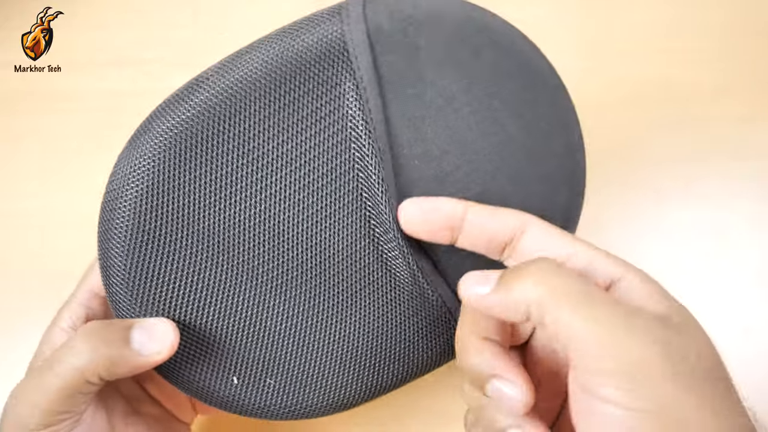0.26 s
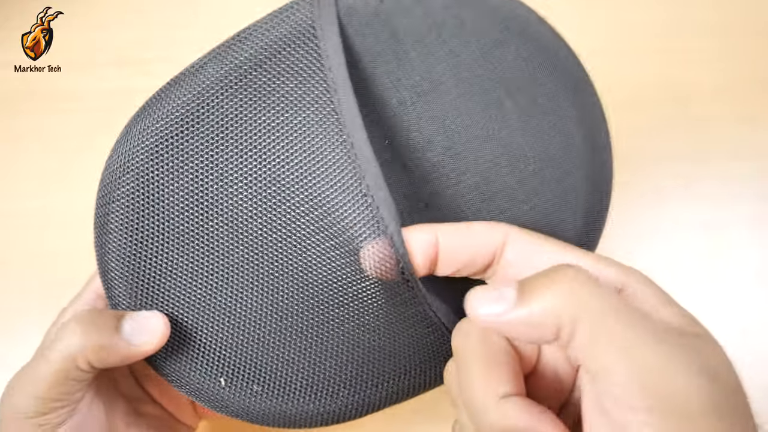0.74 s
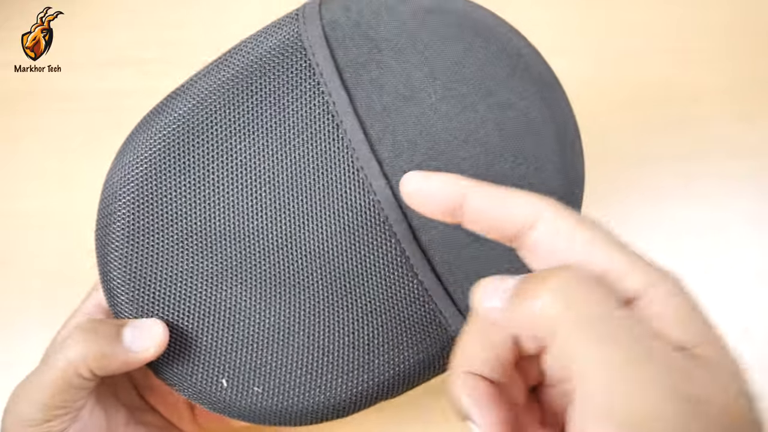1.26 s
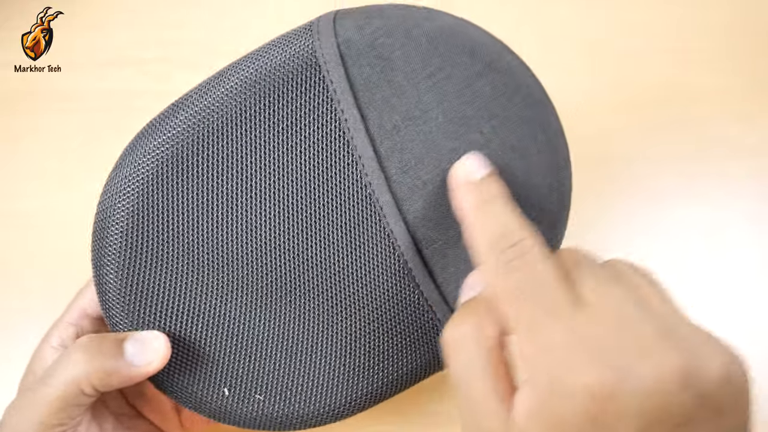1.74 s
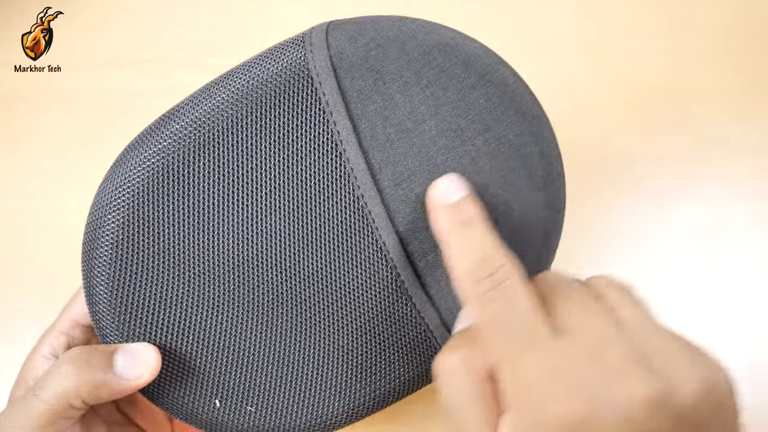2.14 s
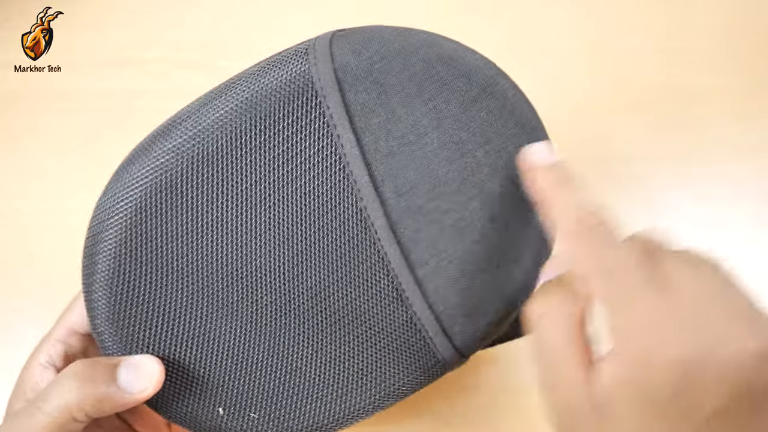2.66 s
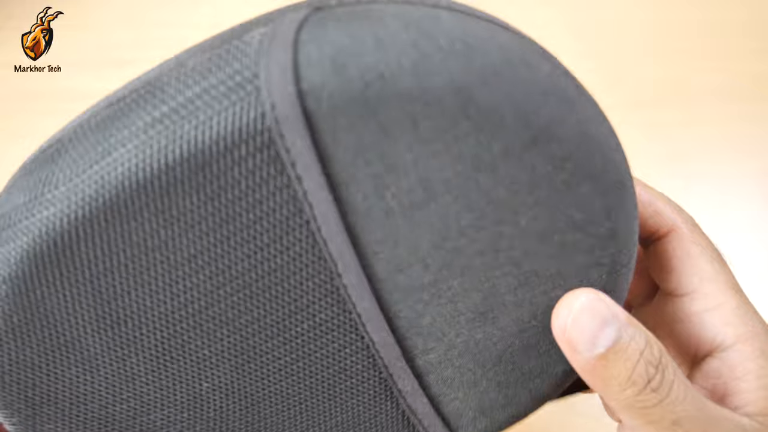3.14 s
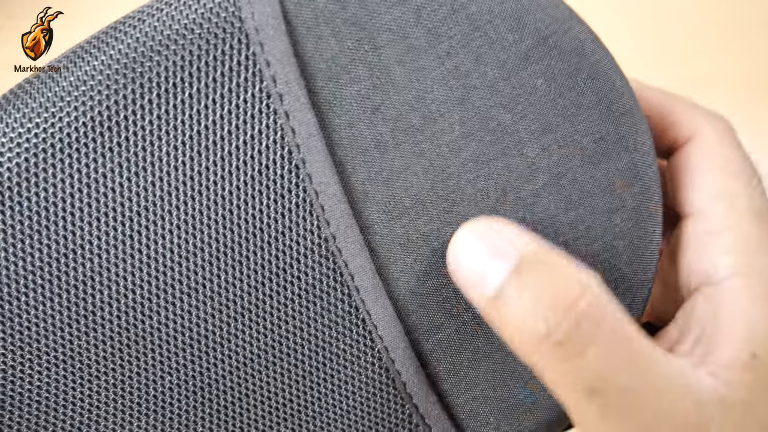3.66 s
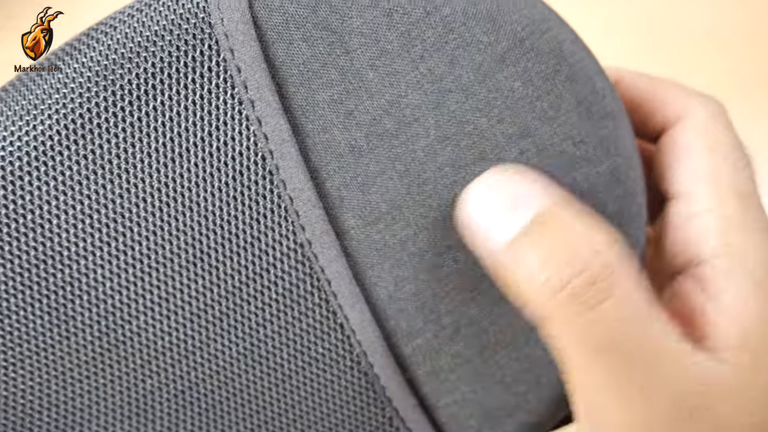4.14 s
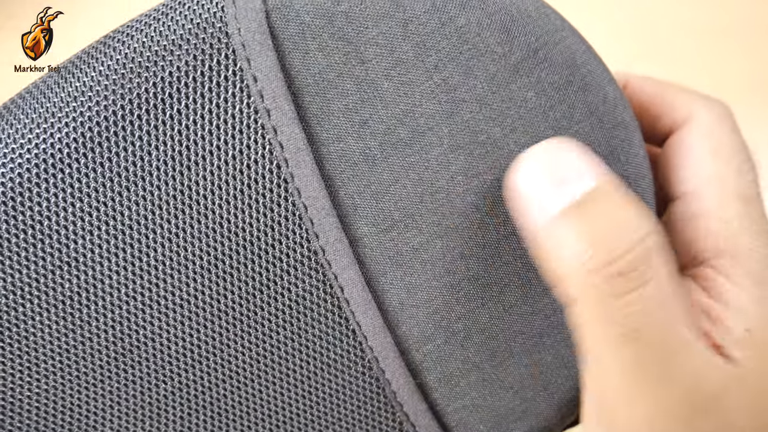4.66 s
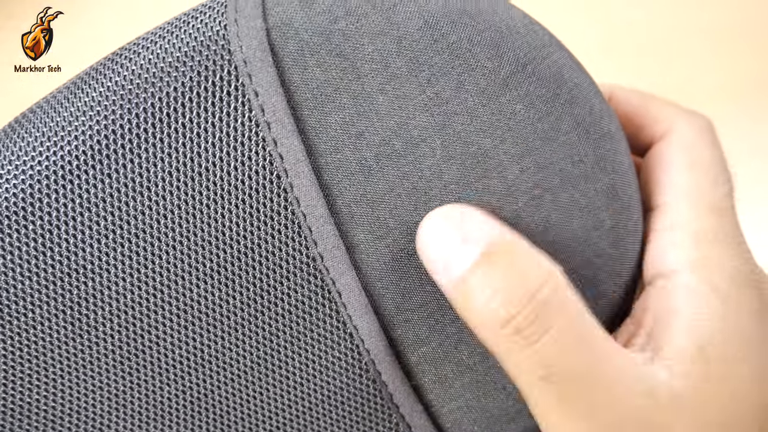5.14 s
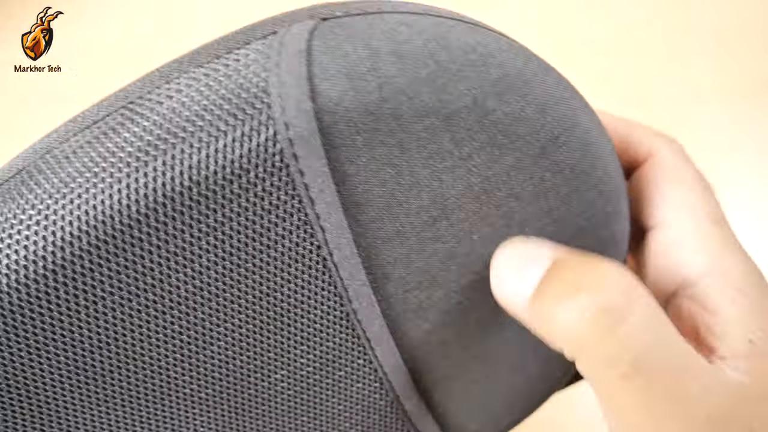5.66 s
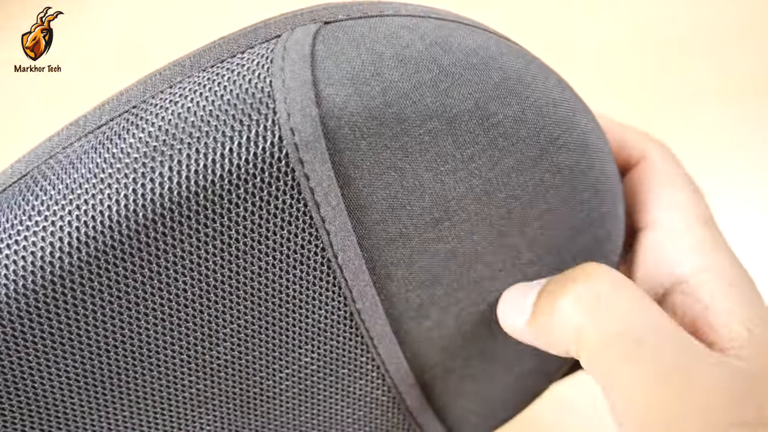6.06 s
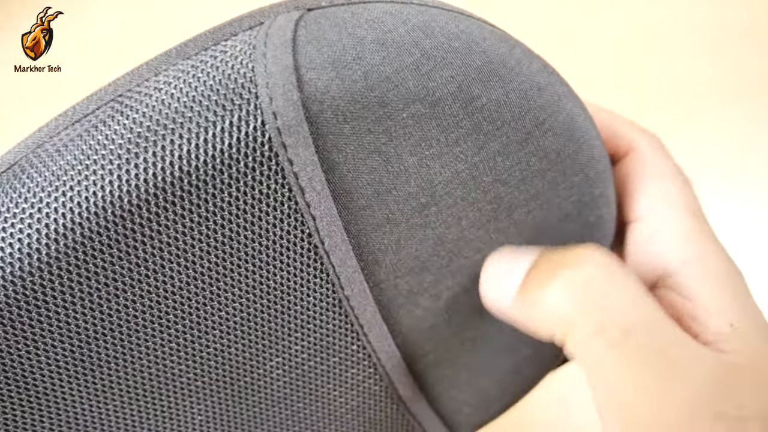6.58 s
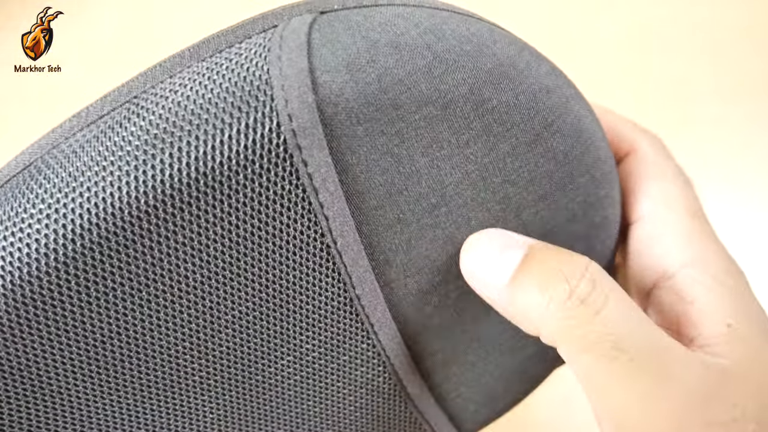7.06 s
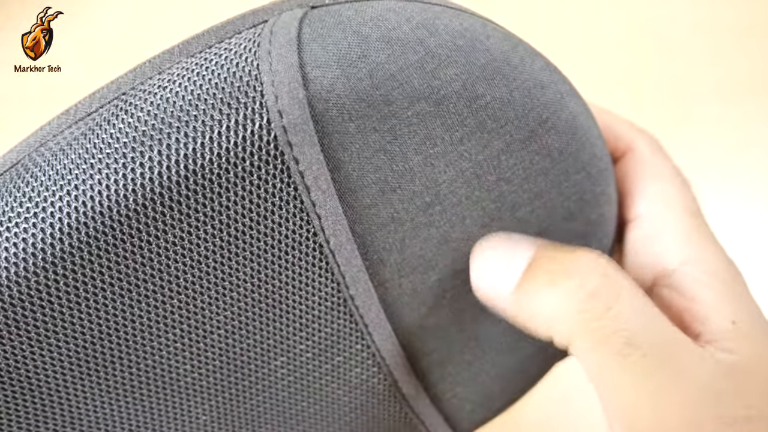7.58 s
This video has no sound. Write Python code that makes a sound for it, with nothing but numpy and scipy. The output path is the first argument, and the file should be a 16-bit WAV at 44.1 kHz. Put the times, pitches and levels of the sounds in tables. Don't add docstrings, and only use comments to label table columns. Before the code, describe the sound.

A finger taps a fabric-covered hard case twice and rustles its mesh pocket, then flicks the hem with a loud, distorted snap. After another dull tap, quick fingertip swipes zip across the weave. A thumb then rubs back and forth, softer and blurrier, and a nail scratches with gritty jerks and tiny ticks. Very close microphone in a quiet room, strong on the left, much fainter on the right.

```python
import sys
import numpy as np
from scipy import signal
from scipy.fft import rfft, irfft, next_fast_len
from scipy.io import wavfile
from scipy.ndimage import uniform_filter1d, map_coordinates

SR = 44100
rng = np.random.default_rng(int(sys.argv[2]) if len(sys.argv) > 2 else 0)


def invert_db(level):
    return 10 ** (np.asarray(level, dtype=float) / 20)


def bounce(signal):
    frames = np.transpose(np.atleast_2d(signal))
    limited = np.clip(frames, -1, 1)
    pcm = np.round(limited * 32767).astype(np.int16)
    wavfile.write(sys.argv[1], SR, pcm)


N = 344421
TIME = np.arange(N) / SR

# pitch_hz, level_db_per_hz
ROOM_TONE = [(29, -31.5), (50, -15.5), (70, -15.5), (81, -26), (159, -36.5), (213, -30.5), (313, -31.5),
             (418, -32.5), (1070, -44), (1500, -40.5), (1960, -45), (14200, -48), (16000, -50)]
# pitch_hz, level_db_per_hz
HAND_RUMBLE = [(8, -37.5), (18, 9.5), (27, 2.5), (45, -18.5), (90, -57)]
# peak_s, rise_s, fall_s, level_db
JOLTS = [
    (.08, 0.045, 0.35, -50.5),
    (.73, 0.09, 0.25, -52),
    (.94, 0.071, 0.061, -47),
    (1.39, 0.053, .04, -49.5),
    (2.501, 0.11, .17, -35.5),
    (2.74, 0.099, 0.64, -45),
    (5.75, 0.39, 0.28, -53.5),
    (6.3, 0.14, .15, -57.5),
    (7.16, 0.11, 0.41, -43.5),
    (7.81, 0.13, 0.12, -51),
]

# pitch_hz, level_db_per_hz
FOREFINGER_FIBRES = [(710, -8), (1200, 2), (1320, -10.5), (1440, -1.5), (1640, -11.5), (1790, -4.5),
                     (2480, -8.5), (3950, -2.5), (4410, -3.5), (7020, -3), (12500, -6), (14800, -5),
                     (16000, -35)]
# pitch_hz, level_db_per_hz
THUMB_FIBRES = [(710, -49), (1200, -6), (1800, -9), (2500, -9), (3250, -9), (3550, -2), (4700, -4.5),
                (5800, -5), (9600, -8.5), (14500, -13), (16000, -22.5)]
# pitch_hz, level_db_per_hz
EDGE_FIBRES = [(710, -34), (1200, -3.5), (1800, -4.5), (2100, -11.5), (3300, -7.5), (3750, -3),
               (5200, -7.5), (5800, -3), (8500, -7.5), (12000, -10), (14500, -13.5), (16000, -24)]
# pitch_hz, level_db_per_hz
BRUSH_FIBRES = [(710, -33), (1200, -2.5), (2200, -8.5), (2700, -2), (4500, -4.5), (9000, -8), (14500, -9.5),
                (16000, -22)]
# pitch_hz, level_db_per_hz
POCKET_RUSTLE = [(120, -31), (200, -6), (369, -2), (633, -16.5), (674, -11), (1020, -8.5), (2500, -18.5),
                 (3250, -57), (5500, -120)]
# pitch_hz, level_db_per_hz
SHELL_RUSTLE = [(120, -30.5), (200, -9.5), (290, -4.5), (502, 0), (681, -3), (757, -9.5), (878, -3.5),
                (1230, -17.5), (2500, -31.5), (3250, -34.5), (5500, -120)]
# pitch_hz, level_db_per_hz
LOW_DRAG = [(40, -33.5), (90, -1.5), (140, 2), (210, 2), (320, -25.5), (600, -42.5)]
# level_db under nail, thumb pad, fingertip
SWISH_DB = (-7.5, -5, -7)
# start_s, end_s
PAD_S = (3.37, 5.5)

# fastest_s, rise_s, fall_s, hiss_db, and threads_hz where the weave is crossed
POCKET = [
    (.038, 0.002, 0.029, -47.5),
    (.135, .012, 0.039, -50),
    (.19, 0.054, 0.12, -57.5),
    (.36, 0.25, 0.14, -51),
    (.515, 0.079, 0.068, -44),
    (.656, 0.12, 0.12, -53),
    (.772, 0.085, 0.087, -47.5),
    (.945, 0.047, 0.028, -44.5),
    (.96, 0.0069, 0.0078, -31.5),
]
SHIFT = [(1.353, .002, 0.065, -58.5), (1.451, .005, 0.01, -56), (1.625, 0.0086, .1, -49.5),
         (3.0, 0.0058, 0.14, -58.5), (3.186, 0.072, 0.054, -53.5), (3.3, 0.064, 0.096, -49.5),
         (5.3, 0.043, 0.21, -55.5), (5.47, 0.05, 0.16, -54), (6.494, 0.0035, 0.037, -52),
         (6.554, 0.0059, 0.036, -56), (7.03, 0.016, 0.077, -73)]
QUICK_OUT = [
    (2.155, 0.096, 0.08, -46.5, 647.8),
]
BRAKING = [
    (1.795, 0.1, .09, -47.5, 690),
    (2.495, .095, 0.072, -45.5, 1150),
]
QUICK_BACK = [
    (2.3, 0.055, .1, -45, 1000),
]
SWEEP_OFF = [
    (1.95, 0.06, .115, -44.5, 930),
    (2.655, 0.079, .09, -44, 920),
]
SLIDE = [
    (3.47, .12, .15, -55, 190),
    (3.66, .1, 0.096, -55.5, 183.9),
]
THUMB_OUT = [
    (3.99, 0.13, .1, -47, 993.3),
    (4.36, 0.082, 0.11, -46.5, 1101),
    (4.746, .1, .11, -47, 1095),
    (5.108, 0.098, .07, -47.5, 1053),
]
THUMB_BACK = [
    (3.76, .13, 0.12, -47.5, 949),
    (4.185, .11, 0.079, -47.5, 1003),
    (4.54, .08, .105, -46.5, 991),
    (4.9, .085, .1, -45.5, 1149),
    (5.215, .05, 0.094, -46, 996),
]
SCRATCH = [
    (5.7, .11, 0.1, -46.5, 640.7),
    (5.855, .05, 0.067, -51, 875.7),
    (6.03, .095, .09, -47, 618.3),
]
RETURN = [(6.162, 0.024, .04, -50, 790), (6.44, 0.02236, .032, -50, 700), (6.727, .02, .035, -53, 740),
          (7.015, 0.01995, .03, -54.5, 600), (7.3, 0.024, .04, -46.5, 790), (7.578, 0.025, .045, -49, 780)]
DIG = [
    (6.957, .013, 0.0362, -46.5, 361.6),
    (7.244, .022, .026, -43, 379.7),
]
SKIM = [
    (6.335, .09, .075, -45.5, 661.4),
    (6.626, .085, .075, -46, 689.7),
]
NAIL = [
    (6.905, 0.068, 0.063, -45.5, 690),
    (7.19, .065, .045, -45, 660),
    (7.46, .065, 0.0448, -46, 640),
    (7.745, 0.049, 0.0412, -46, 740),
]
JAM = [
    (5.727, 0.0159, .03, -53.5, 486.5),
    (7.512, .012, 0.034, -45, 398.4),
    (7.79, 0.019, 0.03, -38.5, 544.4),
]

GESTURES = [
    (POCKET, dict(ends_db=14.0, rise=1.4, fall=1.17, shell_db=1.5, drag_db=-7.0, hum=0, first=1, last=1)),
    (SHIFT, dict(ends_db=12.0, rise=2.05, fall=1.46, shell_db=-6, drag_db=-12.0, hum=0, first=1, last=1)),
    (SLIDE, dict(ends_db=13.5, rise=3.97, fall=5.7, shell_db=-0.5, drag_db=0, hum=0.76, first=.65, last=1.2)),
    (QUICK_OUT, dict(ends_db=22.5, rise=4.55, fall=3.67, shell_db=-0.6, drag_db=-14,
                     hum=.62, first=.5, last=.34, late=.9)),
    (BRAKING, dict(ends_db=23.0, rise=4.6, fall=3.6, shell_db=-0.8, drag_db=-11,
                   hum=.62, first=.6, last=.12, late=.72)),
    (QUICK_BACK, dict(ends_db=24.0, rise=5.9, fall=2.5, shell_db=-0.5, drag_db=-16,
                      hum=.62, first=.3, last=.45, late=.8)),
    (SWEEP_OFF, dict(ends_db=24.5, rise=5.1, fall=2.824, shell_db=-0.5, drag_db=-17,
                     hum=.62, first=.3, last=.88, late=.75)),
    (THUMB_OUT, dict(ends_db=29.5, rise=2.5, fall=2.4, shell_db=-2.5, drag_db=-9.5,
                     hum=0.4514, first=.6, last=0.22, late=.75)),
    (THUMB_BACK, dict(ends_db=20.0, rise=2.16, fall=2.628, shell_db=-4, drag_db=-8.5,
                      hum=0.442, first=0.27, last=.5, late=1.4)),
    (SCRATCH, dict(edge=1.667, ends_db=13.5, rise=2.6, fall=1.486, grows=1.83, shell_db=7.5, drag_db=-3.5,
                   hum=0.449, first=.45, last=0.36)),
    (SKIM, dict(edge=1.663, ends_db=13.5, rise=2.647, fall=1.8, grows=1.17, shell_db=5, drag_db=-4,
                hum=0.31, first=.45, last=.42)),
    (NAIL, dict(edge=1.065, ends_db=9.5, rise=2.2, fall=6.23, grows=1.837, shell_db=7.0, drag_db=-5.5,
                hum=0.58, first=0.55, last=0.75)),
    (RETURN, dict(ends_db=12.0, rise=1.5, fall=0.93, shell_db=7.5, drag_db=-11, hum=0.52, first=.4, last=1.55)),
    (DIG, dict(ends_db=13.0, rise=2.6, fall=2.8, shell_db=12.5, drag_db=7.5, hum=0.78, first=1.45, last=0.65)),
    (JAM, dict(ends_db=7.5, rise=2.3, fall=2.8, shell_db=17.0, drag_db=0.5, hum=0.77, first=1.2, last=0.63)),
]

# start_s, peak_db, rebound_hz, dent_ms, rebound_cycles
TAPS = [(0.0355, -7.5, 147, 1.9, 0.58), (0.0427, -8.5, 165, 2.3, 0.48), (.0462, -27, 400, 1.2, 2.5),
        (0.1272, -22.5, 235, 3, 1.5), (0.1362, -25, 300, 3, 2.6), (1.3517, -8.5, 165, 1.9, 0.66),
        (1.3552, -25, 480, 1, .8), (1.3573, -19, 250, 2.2, .5), (0.5077, -28, 100, 1.2, 1.1),
        (.05, -27, 140, 3, 2.5), (.044, -27, 75, 3, 1.6), (.7534, -31, 330, .8, .8),
        (0.9615, 1.5, 235, 0.58, 0.72), (1.6189, -25.5, 150, 0.51, 0.49), (1.8988, -34, 300, 1.6, 2.2),
        (2.26, -40, 450, 0.66, 1.2), (2.596, -37.5, 453, .6, 1.6), (2.994, -47, 350, .5, 1.5),
        (5.49, -30.5, 48.9, .4, .6), (.9565, -26, 230, 2.5, .8), (6.8069, -30.5, 110, 1.2, 0.72),
        (7.0814, -29.5, 111, 0.81, 0.66), (7.376, -29.5, 111.5, 0.81, 0.56),
        (7.5035, -19.5, 440, 0.65, 3.5), (7.535, -31, 200, 1.5, 4), (7.5696, -30, 326, 0.76, 1.2),
        (7.6465, -33, 110, 0.72, 0.7), (7.7795, -26, 600, 0.47, 3.9)]
# start_s, level_db, pitch_hz, decay_cycles, crack_db (over the snap)
SNAPS = [(0.0356, -24, 1430, 1.5, -22.5), (1.3517, -22, 1400, 1.8, -18), (1.6192, -40, 1000, 2, -20),
         (0.5229, -19.5, 1100, 2.8, -19), (0.7535, -31, 1900, 2.5, -4), (.1275, -40, 1500, 2, -14),
         (2.9935, -47, 1200, 2, -10), (6.551, -43, 1100, 2, -10), (.9618, 12.5, 1560, 1.9, -22),
         (2.26, -41, 900, 2, -12), (5.4911, -31, 705, 2.4, -26)]
# pitch_hz, level_db
WALL_ANSWER = [(60, 7.5), (130, 3.5), (300, 12), (560, 4.5), (1000, 4.5), (1700, -6.5), (3000, 3.5),
               (6000, -0.5), (12000, 1)]
# pitch_hz, t60_s
WALL_DECAY = [(60, 0.72), (200, 0.18), (420, 0.099), (1100, 0.51), (3000, 0.58), (8000, 0.51)]
# pitch_hz, level_db, t60_s
ROOM_MODES = [(132, -7, 0.7), (202.8, -2, 0.5), (260, -6, 0.7), (298.6, 3, .2), (334.4, -1.5, 0.25),
              (400.6, 1.5, 0.28), (365.8, 5, 0.41), (438, 8, 0.14)]
# start_s, level_db
TICKS = [
    (0.1273, -51),
    (1.62, -51),
    (2.9933, -55),
    (3.254, -47),
    (6.2, -35.5),
    (6.494, -46),
    (6.763, -33),
    (7.063, -33.5),
    (7.345, -39),
    (7.618, -35.5),
]
# start_s, level_db, pitch_hz, decay_cycles
FLAP = [
    (.9619, -7.5, 4050, 2.1),
    (.9619, -3, 6000, 3.2),
    (.9619, -8, 13000, 3),
]


def unit(x):
    return x / np.sqrt(np.mean(x ** 2) + 1e-20)


def along(points, hz):
    f, v = np.transpose(points)
    return np.interp(np.log(hz + 1), np.log(f + 1), v)


def wobble(rate):
    knots = rng.standard_normal(int(N * rate / SR) + 4)
    return unit(map_coordinates(knots, [TIME * rate]))


def coloured(x, spectrum):
    m = next_fast_len(N + 8192)
    gain = invert_db(along(spectrum, np.fft.rfftfreq(m, 1 / SR)))
    return unit(irfft(rfft(x, m) * gain, m)[:N])


def arch(s, rise_s, fall_s, ends_db, rise, fall):
    on = slice(max(round((s - 3 * rise_s) * SR), 0), round((s + 3 * fall_s) * SR))
    u = TIME[on] - s
    return on, -ends_db * np.where(u < 0, np.abs(u / rise_s) ** rise, np.abs(u / fall_s) ** fall)


def background():
    grip = np.full(N, invert_db(-65.5))
    for s, rise_s, fall_s, db in JOLTS:
        on, swing_db = arch(s, rise_s, fall_s, ends_db=18.0, rise=1.4, fall=0.89)
        grip[on] += invert_db(db + swing_db)
    shake = grip * coloured(invert_db(2.2 * wobble(7.1)) * rng.standard_normal(N), HAND_RUMBLE)
    air = coloured(invert_db(.8 * wobble(14)) * rng.standard_normal(N), ROOM_TONE)
    return shake + invert_db(-61.5) * air


def strokes():
    shell_grows, drag_grows = 1.54, 0.55
    drag_late, resting_drag_db = 0.46, -75.5
    roundness = 1.15
    hiss, bright, shell, press, share = np.zeros((5, N))
    rate, cross = np.full(N, 400.), np.full(N, 700.)
    for rows, g in GESTURES:
        ends_db, rise, fall = g["ends_db"], g["rise"], g["fall"]
        first, last, edge = g["first"], g["last"], g.get("edge", 1)
        for s, rise_s, fall_s, db, *threads_hz in rows:
            on, speed_db = arch(s, rise_s, fall_s, ends_db, rise, fall)
            _, grip_db = arch(s, rise_s, fall_s, ends_db, edge * rise, edge * fall)
            bright[on] += invert_db(2 * (db + speed_db))
            hiss[on] += invert_db(2 * (db + grip_db))
            shell[on] += invert_db(2 * (db + g["shell_db"] + g.get("grows", shell_grows) * speed_db))
            late = drag_late * fall_s
            on, press_db = arch(s + late, rise_s + late, fall_s - late, ends_db, rise, fall)
            press[on] += invert_db(2 * (db + g["drag_db"] + drag_grows * press_db))
            for mid_hz in threads_hz:
                on = (TIME >= s - rise_s) & (TIME < s + fall_s)
                u = (TIME[on] - s + rise_s) / (rise_s + fall_s)
                ends = first + (last - first) * u
                bow = np.abs(np.sin(np.pi * np.abs(u) ** g.get("late", 1))) ** roundness
                rate[on] = mid_hz * (ends + (1 - (first + last) / 2) * bow)
                cross[on] = rate[on] * 1.75 ** np.sign(795 - mid_hz)
                share[on] = np.clip(g["hum"], 0, 1)
    share = np.clip(uniform_filter1d(share, size=200), 0, 1)
    press = np.sqrt(press) + invert_db(resting_drag_db)
    return np.sqrt(hiss), np.sqrt(bright), np.sqrt(shell), press, rate, cross, share


def patchy(x, depth_db):
    z = signal.stft(x, nperseg=256)[2]
    field = uniform_filter1d(rng.standard_normal(z.shape), size=5, axis=0)
    field = uniform_filter1d(field, size=20, axis=1)
    return signal.istft(z * invert_db(depth_db * unit(field)), nperseg=256)[1][:N]


def rubbing():
    hiss, bright, shell, press, rate, cross, share = strokes()
    quick = (TIME > 1) & (TIME < 3)
    pad = (TIME > PAD_S[0]) & (TIME < PAD_S[1])
    brush = (TIME > 3) & (TIME < PAD_S[0])

    blur = np.where(pad & (rate > 260), 2.4, 1)
    jitter = .075 * blur * (1.1 - share) * wobble(160)
    phase = 2 * np.pi * np.cumsum(rate * (1 + jitter)) / SR
    weft = 2 * np.pi * np.cumsum(cross * (1 + 0.099 * wobble(160))) / SR
    warp_hum = invert_db(3.3 * wobble(90)) * np.sin(phase)
    weft_hum = invert_db(np.where(quick, -8.5, -14) + 4.3 * wobble(67)) * np.sin(weft)
    hum = unit(warp_hum + weft_hum)

    drag = invert_db(2.3 * wobble(70)) * rng.standard_normal(N)
    rustle = np.where(TIME < 1, coloured(drag, POCKET_RUSTLE), coloured(drag, SHELL_RUSTLE))
    swish = (share > 0) * unit(uniform_filter1d(drag, size=60) * np.sin(1.5 * phase))
    rustle = rustle + invert_db(np.select([pad, quick], SWISH_DB[1:], SWISH_DB[0])) * swish

    snap_size = invert_db(2.4 * rng.exponential(size=N).clip(0, 4))
    snaps = (rng.random(N) < .02) * snap_size * rng.standard_normal(N)
    grip = invert_db(1.87 * wobble(35) + 0.12 * wobble(200))
    grip = grip * (1 + 0.37 * share * np.sin(phase))
    tearing = patchy(grip * (rng.standard_normal(N) + 0.16 * unit(snaps)), depth_db=1.2)
    skins = [coloured(tearing, c) for c in (FOREFINGER_FIBRES, THUMB_FIBRES, BRUSH_FIBRES)]
    fibres = np.select([quick, pad, brush], skins, coloured(tearing, EDGE_FIBRES))
    dull = uniform_filter1d(fibres, size=4)
    fibres = dull + (fibres - dull) * np.clip(bright / invert_db(-51.0), .2, 1.5) ** 0.33

    low = press * coloured(invert_db(2.5 * wobble(30)) * rng.standard_normal(N), LOW_DRAG)
    return hiss * fibres + shell * (np.sqrt(share) * hum + np.sqrt(1 - share) * rustle) + low


def fingertip_taps():
    out, t = np.zeros(N + SR), np.arange(2000) / SR
    for s, db, rebound_hz, dent_ms, cycles in TAPS:
        u = t * 1000 / dent_ms
        phase = np.pi * (1 - np.exp(-u)) * .8 + 2 * np.pi * rebound_hz * t
        shape = (1 - np.exp(-(u / 0.4) ** 2)) * np.exp(-(t * rebound_hz / cycles) ** 2)
        out[round(s * SR):][:len(t)] -= invert_db(db) * np.sin(phase) * shape
    return out[:N]


def cloth_snaps():
    out, t = np.zeros(N + SR), np.arange(2000) / SR
    for s, db, hz, cycles, crack_db in SNAPS:
        crack = invert_db(crack_db - 60 * t / 0.00021) * np.sin(2 * np.pi * 4200 * t)
        ring = invert_db(-14 * t * hz / cycles) * np.sin(2 * np.pi * hz * t)
        out[round(s * SR):][:len(t)] -= invert_db(db) * (ring + crack)
    return out[:N]


def snap_scatter():
    walls = np.zeros(N)
    for s, db, *_ in SNAPS:
        walls[round(s * SR)] = invert_db(db - 0.5)
    return uniform_filter1d(np.diff(walls, prepend=0), size=3)


def room(x):
    hz, t, z = signal.stft(rng.standard_normal(SR * 3 // 4), SR, nperseg=256)
    decay_db = along(WALL_ANSWER, hz)[:, None] - 60 * t / along(WALL_DECAY, hz)[:, None]
    tail = signal.istft(z * invert_db(decay_db), SR, nperseg=256)[1]
    t = np.arange(len(tail)) / SR
    modes = sum(invert_db(db - 60 * t / t60) * np.sin(2 * np.pi * f * t) for f, db, t60 in ROOM_MODES)
    tail = (tail + invert_db(-15.5) * modes) * (1 - np.exp(-t / 0.0048))
    return signal.fftconvolve(np.pad(x, (130, 0)), tail / np.linalg.norm(tail))[:N]


def fibre_ticks():
    out, t = np.zeros(N + SR), np.arange(2000) / SR
    for s, db in TICKS:
        partials = np.sin(2 * np.pi * 4800 * t) + .6 * np.sin(2 * np.pi * 11500 * t)
        out[round(s * SR):][:len(t)] += invert_db(db - 60 * t / .001) * partials
    return out[:N]


def hem_flap():
    near, t = np.zeros(N), np.arange(400) / SR
    for s, db, hz, cycles in FLAP:
        near[round(s * SR):][:len(t)] -= invert_db(db - 14 * t * hz / cycles) * np.sin(2 * np.pi * hz * t)
    return near


def scene():
    air, rub = background(), rubbing()
    hits = fingertip_taps() + cloth_snaps() + fibre_ticks()
    echo = invert_db(-17.0) * room(hits + snap_scatter() + 1.07 * rub)
    mono = hits + rub + echo + hem_flap() + air
    return mono * invert_db([[5.1], [-14.4]])


def roll_off(x):
    return signal.sosfilt(signal.butter(12, 15840, fs=SR, output="sos"), x)


def record(dry):
    hiss_spectrum = [(50, 13.5), (500, -10.0), (4000, -18.5), (16000, -5.0)]  # Hz, dB per Hz
    hiss = [invert_db(db) * coloured(rng.standard_normal(N), hiss_spectrum) for db in (-70, -69)]
    x = dry + hiss
    x = x / (1 + np.abs(x / .995) ** 12) ** (1 / 12)
    m = next_fast_len(N)
    band = np.where(np.fft.rfftfreq(m, 1 / SR) < 15850, 1, invert_db(-21.5))
    x = irfft(rfft(x, m) * band, m)[:, :N]
    return roll_off(x)


dry = scene()
out = record(dry)
bounce(out)
```